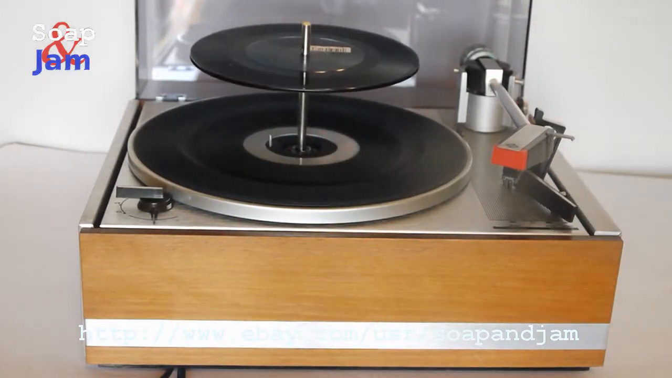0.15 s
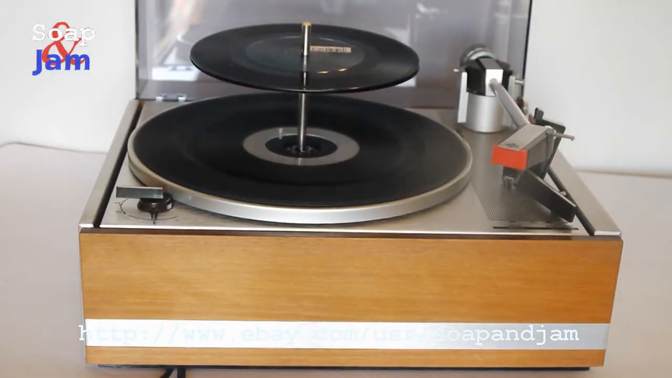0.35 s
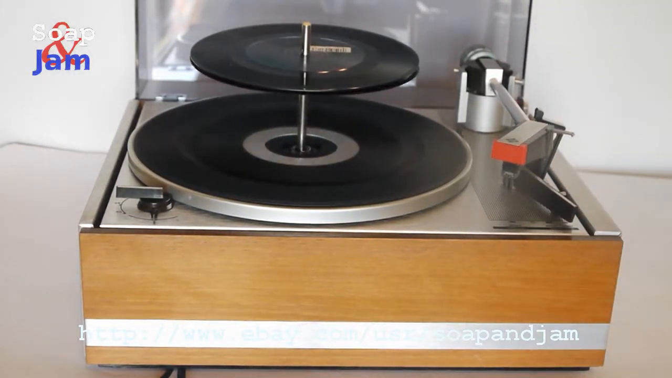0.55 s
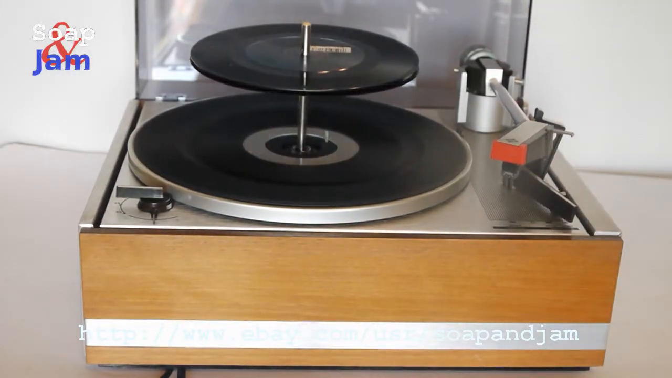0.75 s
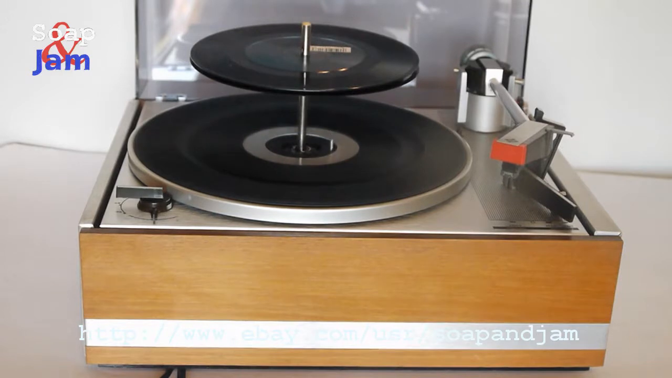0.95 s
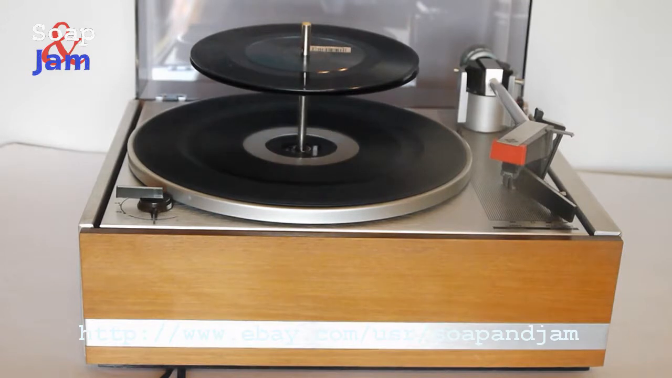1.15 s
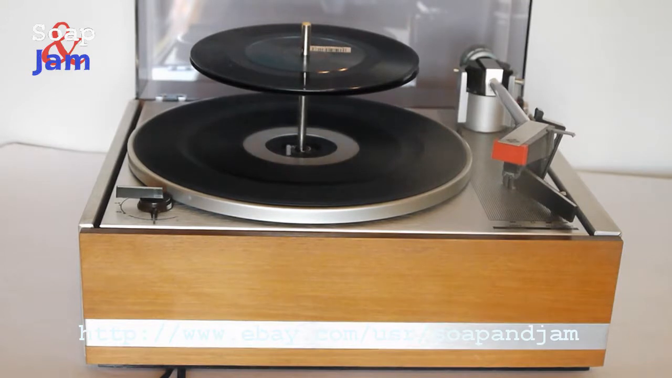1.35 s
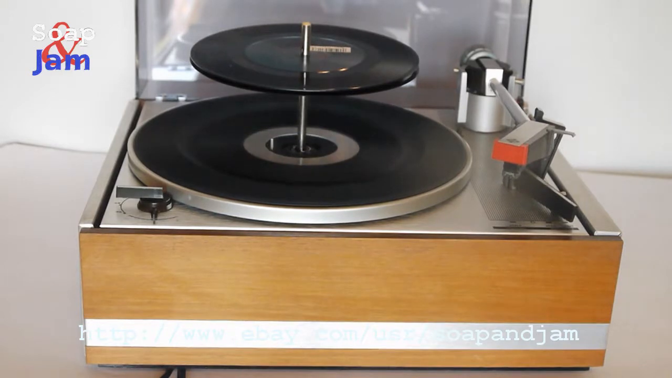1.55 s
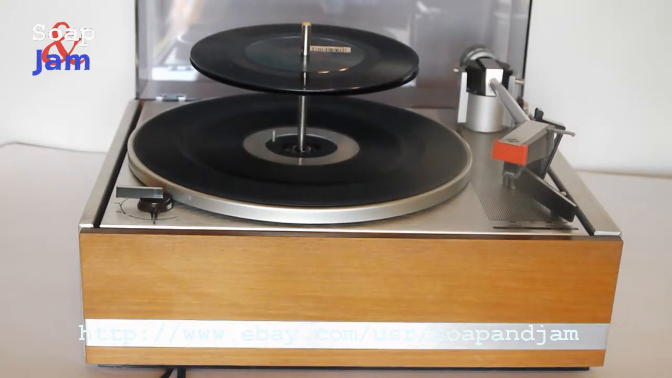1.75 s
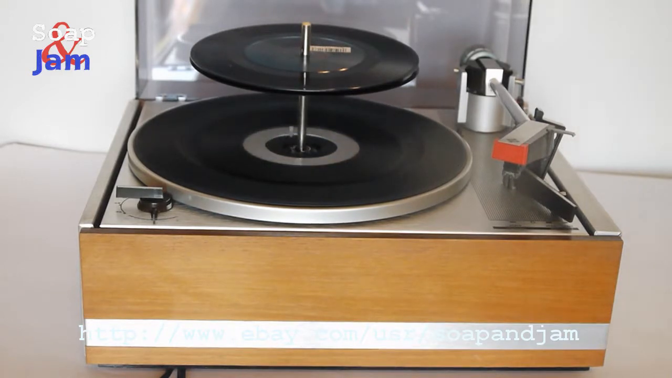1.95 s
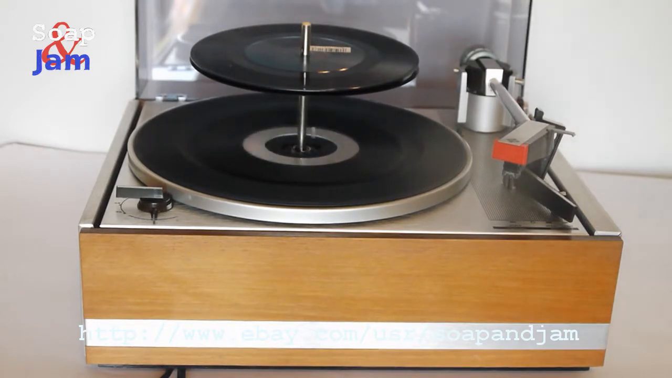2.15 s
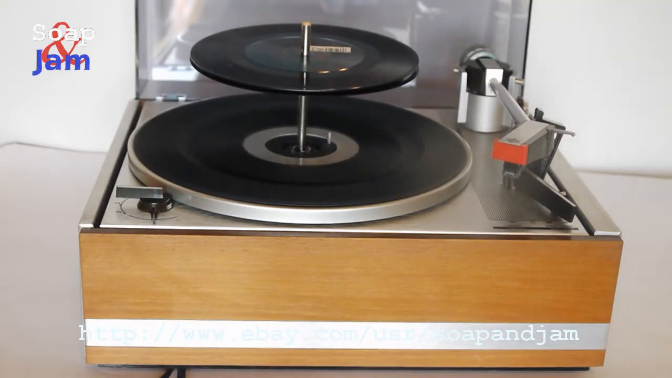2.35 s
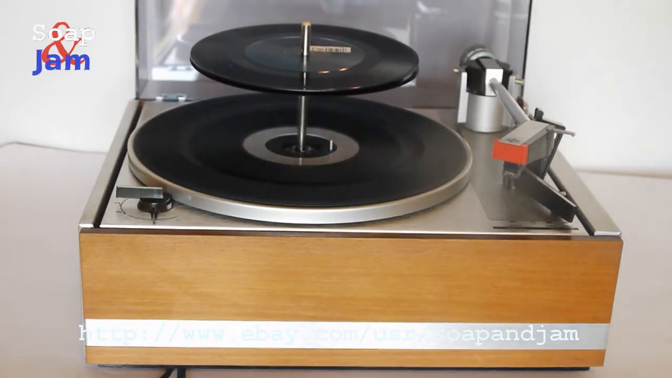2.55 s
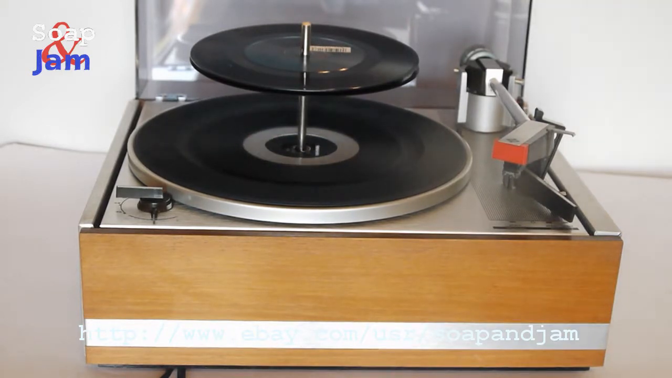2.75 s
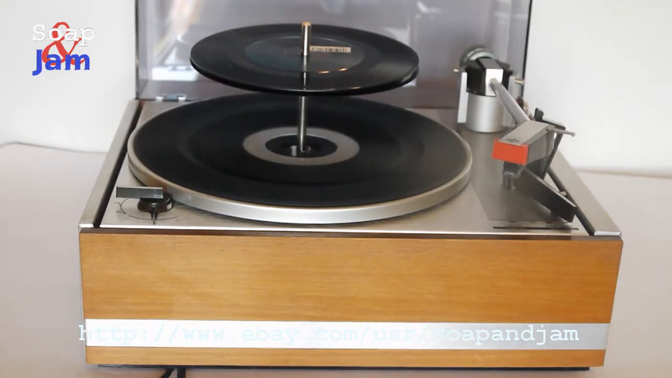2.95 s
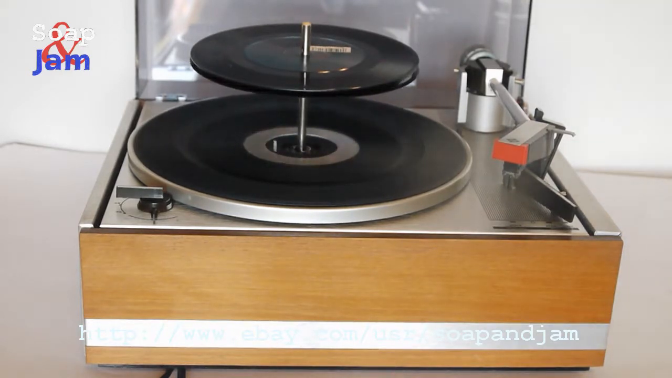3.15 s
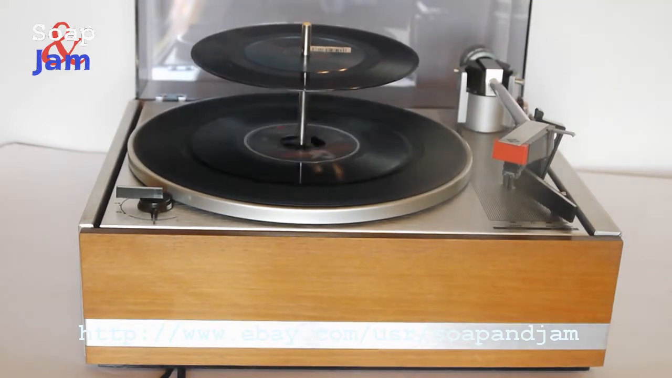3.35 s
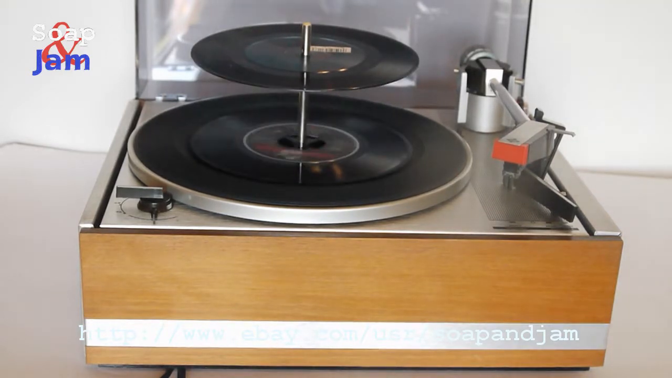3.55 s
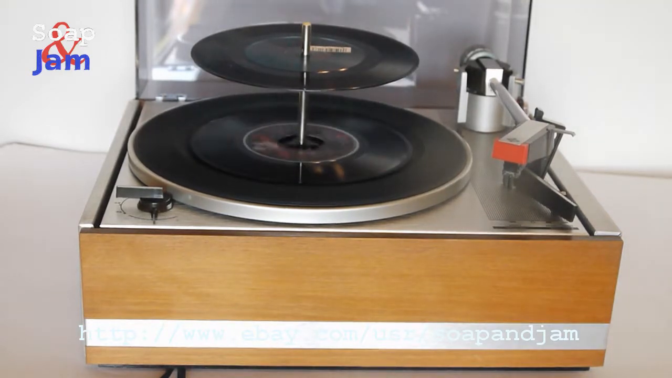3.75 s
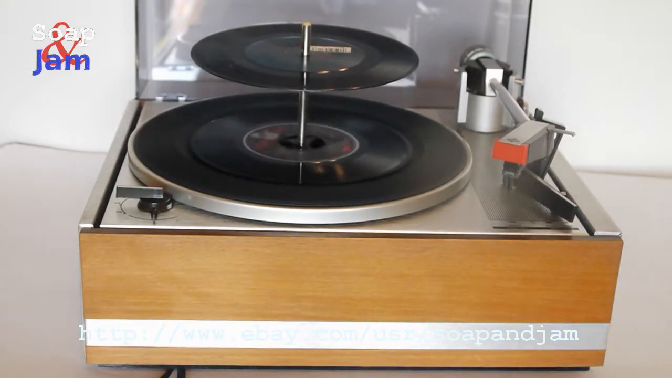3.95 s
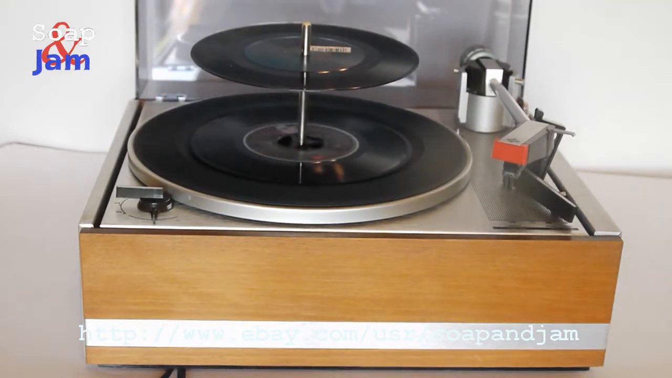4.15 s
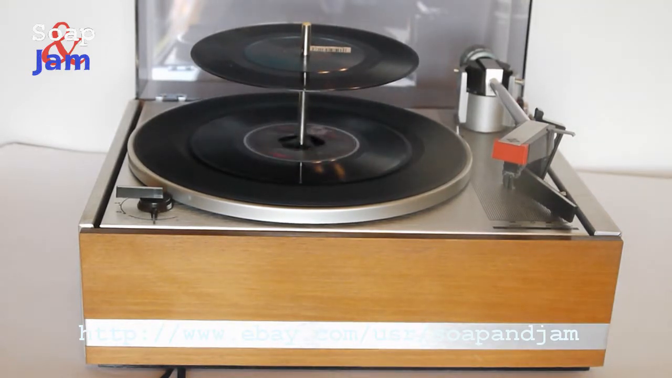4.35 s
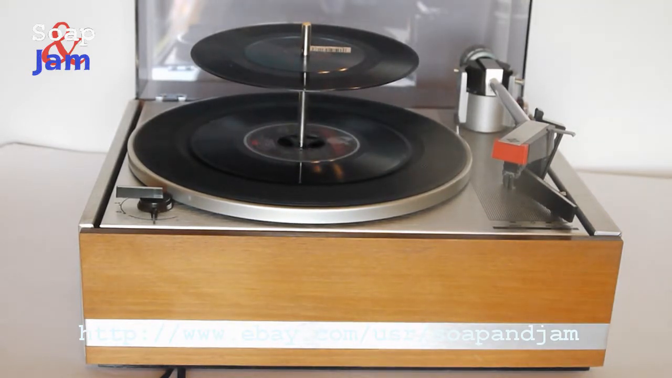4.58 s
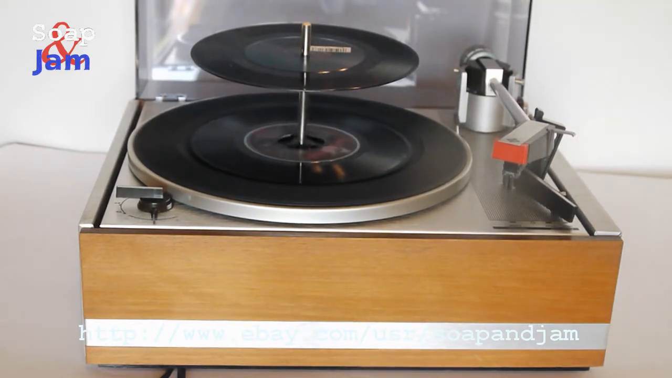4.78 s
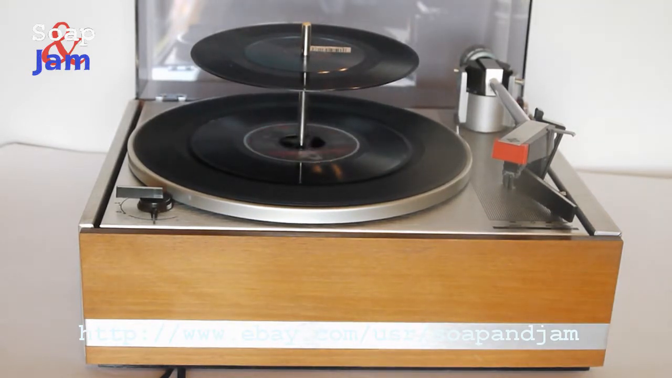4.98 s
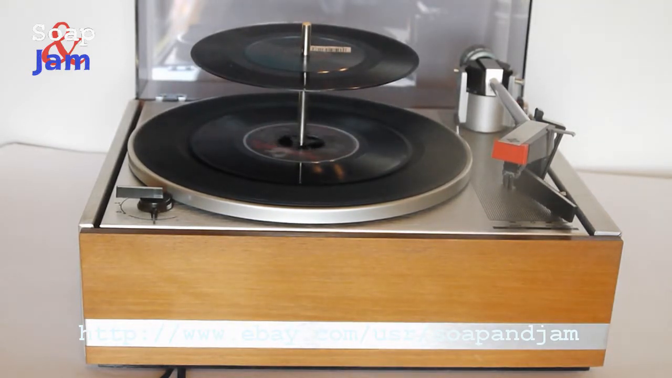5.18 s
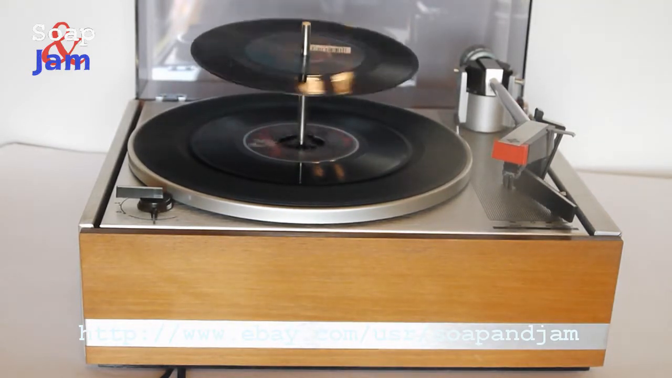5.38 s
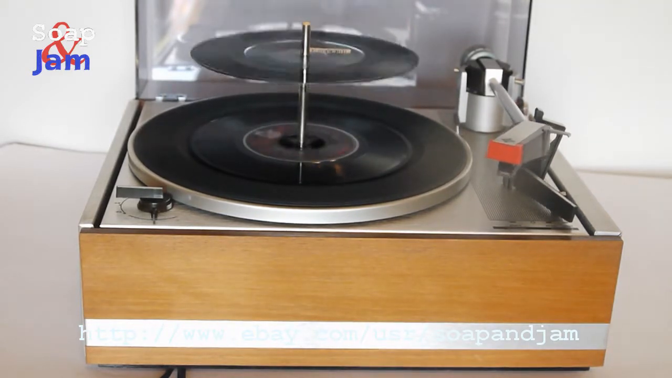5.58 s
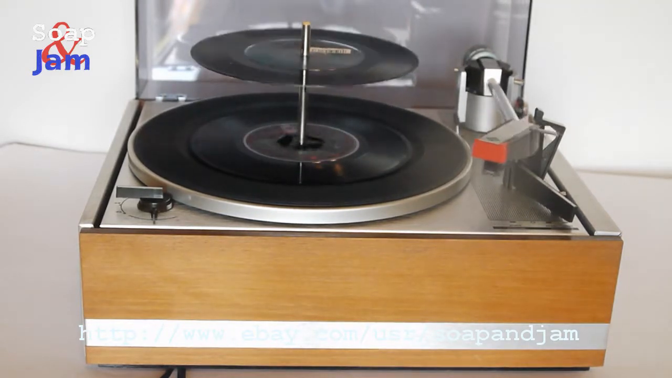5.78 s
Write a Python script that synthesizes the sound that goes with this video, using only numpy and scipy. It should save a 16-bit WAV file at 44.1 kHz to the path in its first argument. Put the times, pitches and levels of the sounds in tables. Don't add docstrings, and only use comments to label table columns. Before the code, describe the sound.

Close mono pickup of a record changer in a small room. A low motor hum and whir runs throughout under faint rubbing and thin squeaks. Sparse light clicks and regular soft ticks lead to a sharp release snap, then a loud flat slap as the disc hits the platter with a woody boom. Afterward come a softer settling tap, lever clanks, a pawl and a brief arm rattle.

```python
import sys
import numpy as np
from scipy import signal
from scipy.fft import rfft, irfft, next_fast_len
from scipy.io import wavfile
from scipy.ndimage import uniform_filter1d, map_coordinates

SR = 44100
rng = np.random.default_rng(int(sys.argv[2]) if len(sys.argv) > 2 else 0)


def makeup_ratio(level_db):
    decades = np.asarray(level_db, float) / 20
    return 10 ** decades


def log_audio(samples):
    frames = np.atleast_2d(samples).T
    limited = np.clip(frames, -1, 1)
    pcm = np.round(limited * 32767).astype(np.int16)
    wavfile.write(sys.argv[1], SR, pcm)


N = 256652


# t/s, level/dB
RELEASE = [
    (3.2145, -16.5),
    (3.224, -14),
    (3.231, -16.5),
    (3.238, -24.5),
    (3.262, -28),
]
# t/s, level/dB
LANDING = [
    (3.338, -6),
    (3.3428, -3),
    (3.3456, -2),
    (3.3495, -7.5),
    (3.356, -13),
]
# t/s, level/dB
SETTLING = [
    (3.675, -22),
    (3.682, -26),
    (3.7, -25.5),
    (3.722, -28.5),
    (3.735, -40),
]
# tilt/(dB/octave), rattle t60/s, ring/dB
RELEASE_FEEL = [(3, .045, -5), (-4, 0.059, -0.5)]
LANDING_FEEL = [(7.5, 0.014, -6.5), (-1.05, 0.081, -10)]
SETTLING_FEEL = [(-.3, 0.057, -8.5), (-.6, 0.071, -15)]
# f/Hz, width/Hz, level/dB
SPINDLE = [(620, 30, -10), (729, 42, -4), (960, 58, -3.5), (1535, 51, -3), (2064, 80, -5.5),
           (2510, 510, -14), (5540, 220, -25), (6250, 190, -24.5)]
PLATTER = [(970, 35, -17), (1460, 190, 2.5), (1766, 38, 1.5), (2960, 90, 1.5), (3450, 94, -0.5),
           (4440, 520, -2.5), (4940, 91, -9), (5130, 240, 0.5)]
# f/Hz, level/(dB per Hz)
SPINDLE_COLOUR = [(180, -22), (300, 7), (530, -1.5), (1500, -1.5), (2130, -9.5), (4100, -18), (6200, -11),
                  (7500, -22)]
PLATTER_COLOUR = [(180, -46), (300, -6), (900, -4), (1500, 2), (2000, -1.5), (5200, -2), (6400, -8),
                  (7500, -21)]
LEVER_COLOUR = [(150, -54), (400, -18.5), (1000, -10), (3000, -18), (7000, -25)]


def disc():
    release = strike(run_of(RELEASE, RELEASE_FEEL), SPINDLE, SPINDLE_COLOUR, wet_db=-4.5)
    landing = strike(run_of(LANDING, LANDING_FEEL), PLATTER, PLATTER_COLOUR, wet_db=-5.5)
    settling = strike(run_of(SETTLING, SETTLING_FEEL), PLATTER, LEVER_COLOUR, wet_db=-3.0)
    return release + landing + settling


# t/s, level/dB
LATCH = [
    (.2505, -25.5),
    (.2535, -20.5),
    (.2585, -24.5),
]
# t/s, level/dB
TICKS = [(.487, -34), (.9763, -32.5), (1.502, -34.5), (2.0086, -32), (2.5387, -32), (3.0525, -34),
         (3.5746, -35), (4.0904, -35), (4.613, -35), (5.1198, -34.5), (5.6488, -33)]
# t/s, level/dB, tilt/(dB/octave), rattle
# t60/s
CLICKS = [(1.217, -35.5, -3, 0.066), (1.259, -34.5, -2, .048), (1.287, -32.5, 1, 0.027),
          (1.502, -41, -2, .04), (1.738, -31, -2.5, 0.09), (1.778, -23.5, 3, 0.057),
          (2.735, -34.5, -9, 0.055), (2.848, -37.5, -2.5, 0.037), (3.110, -17.5, 2.5, 0.061),
          (4.034, -26, 0.5, 0.066), (4.081, -29, -3.5, 0.048), (4.138, -29, -11, 0.086),
          (5.25, -40, -1, .06)]
# t/s, level/dB
PAWL = [
    (4.830, -31.5),
    (4.845, -40),
    (4.867, -29.5),
    (4.885, -36),
]
# t/s, level/dB
CLANKS = [
    (4.306, -21.5),
    (4.322, -27.5),
]
BIG_CLANK = [
    (4.6525, -15.5),
    (4.659, -17),
]
# t/s, level/dB
ARM_SWING = [
    (5.417, -26.5),
    (5.426, -43),
    (5.445, -30),
    (5.463, -27),
    (5.473, -32.5),
    (5.489, -29.5),
    (5.499, -32),
    (5.512, -36),
    (5.535, -42),
]
# tilt/(dB/octave), rattle t60/s, ring/dB
LATCH_FEEL = [(.3, 0.075, -1.7), (-0.32, 0.042, -1.7)]
TICK_FEEL = [(-6.5, 0.033, 7), (-3, 0.03, 7)]
PAWL_FEEL = [(.7, 0.13, -2.2), (-.3, 0.075, -1.5)]
CLANK_FEEL = [(-2, 0.053, .6), (-.6, 0.022, 5)]
BIG_CLANK_FEEL = [(3, 0.012, 3), (-.3, 0.073, 7.7)]
ARM_FEEL = [(1, 0.033, 2), (-5.5, 0.071, 6)]
# f/Hz, width/Hz, level/dB
CATCH = [(1310, 63, -18), (2045, 380, -2.5), (2666, 15, 5.5), (3300, 380, -13)]
GEAR = [(1737, 81, 2.5), (1943, 200, -1.5), (3800, 330, -14.5)]
CHASSIS = [(1150, 200, -3), (2180, 320, 0), (2670, 250, -2.5), (3440, 200, -10), (4680, 240, -12.5)]
SPRING = [(1365, 38, 5), (2050, 210, -3), (2790, 48, 1), (3270, 150, -5), (5300, 460, -12)]
SMALL_LEVER = [(1230, 58, -2), (1890, 52, -12.5), (2190, 120, -11), (2450, 80, -18), (3100, 37, -11.5),
               (5600, 110, -22)]
LEVER = [(1016, 100, -4.5), (1255, 52, 4.5), (2200, 160, -5), (3264, 145, -4.5), (4650, 140, -11.5),
         (5950, 230, -15)]
ARM = [(996, 60, -1), (1106, 39, 5), (1190, 60, 0.5), (1314, 82, -3), (1894, 51, -5.5), (2350, 300, -16),
       (3420, 120, -8.5), (4380, 140, -17)]
# f/Hz, level/(dB per Hz)
CATCH_COLOUR = [(150, -36), (250, -8), (1300, -3), (2000, -8), (2650, -3.5), (3950, -19), (6090, -10),
                (7000, -27.5)]
GEAR_COLOUR = [(800, -37.5), (1500, -16), (2200, -16.5), (4000, -17.5), (7000, -43.5)]
CHASSIS_COLOUR = [(200, -31.5), (300, -15.5), (880, -9.5), (2000, -6), (2620, -6), (3980, -12),
                  (4700, -11.5), (7000, -20)]


def mechanism():
    click_ring_db = -3
    click_contacts = [(*row, click_ring_db) for row in CLICKS]
    catch = strike(run_of(LATCH, LATCH_FEEL), CATCH, CATCH_COLOUR, wet_db=-3.5)
    ticks = strike(run_of(TICKS, TICK_FEEL), GEAR, GEAR_COLOUR, wet_db=-2)
    clicks = strike(click_contacts, CHASSIS, CHASSIS_COLOUR, wet_db=-5.0)
    pawl = strike(run_of(PAWL, PAWL_FEEL), SPRING, LEVER_COLOUR, wet_db=-3.0)
    clanks = strike(run_of(CLANKS, CLANK_FEEL), SMALL_LEVER, LEVER_COLOUR, wet_db=-4.5)
    big_clank = strike(run_of(BIG_CLANK, BIG_CLANK_FEEL), LEVER, LEVER_COLOUR, wet_db=-3.0)
    arm = strike(run_of(ARM_SWING, ARM_FEEL), ARM, LEVER_COLOUR, wet_db=-3.5)
    return catch + ticks + clicks + pawl + clanks + big_clank + arm


# t/s, level/dB
THUDS = [
    (1.744, -38.5),
    (1.785, -43),
    (3.119, -33.5),
    (3.227, -30),
    (3.235, -27),
    (3.346, -17),
    (3.42, -30.5),
    (4.139, -39),
    (4.655, -34),
]
# f/Hz, level/dB, t60/s
PLINTH = [(291.2, 3, 0.17), (310, 0, 0.1), (270, -23.5, 0.085)]


def plinth():
    out = np.zeros(N + SR)
    t = np.arange(SR // 3) / SR
    onset = 1 - np.exp(-t / 0.0043)
    for s, db in THUDS:
        boom = 0
        for hz, level_db, t60_s in PLINTH:
            decay = makeup_ratio(level_db + rng.normal(0, 0.61) - 60 * t / t60_s)
            boom = boom + decay * np.sin(2 * np.pi * hz * t)
        out[round(s * SR):][:len(t)] += makeup_ratio(db - 3.0) * onset * boom
    return out[:N]


# t/s, half length/s, rub level/dB, grit level/dB
LOBES = [
    (0, 0.075, -61, -60),
    (0.56, 0.15, -74, -59),
    (.92, .12, -75, -60.5),
    (2.815, 0.13, -65.5, -75),
    (2.944, 0.047, -51, -75),
    (3.306, .07, -54, -75),
    (3.563, 0.089, -65.5, -67),
    (4.813, .1, -66, -78),
    (5.536, 0.14, -69, -75),
]
# f/Hz, level/(dB per Hz)
RUB = [(700, -28.5), (1300, -6), (1900, -2), (2600, -3), (3800, -8), (5000, -10.5), (5900, -11),
       (7000, -20.5)]
GRIT = [(2500, -29), (3400, -2.5), (4300, 2), (5000, -1.5), (5800, -2), (6500, -20.5)]


def cam():
    rub_floor_db, grit_floor_db = -58.5, -77
    s, half_s, rub_db, grit_db = np.transpose(LOBES)[..., None]
    pressing = np.exp(-((np.arange(N) / SR - s) / half_s) ** 2)
    rub = makeup_ratio(rub_floor_db) + (makeup_ratio(rub_db) * pressing).sum(axis=0)
    rub = rub * makeup_ratio(1.5 + 0.65 * wobble(22))
    grit = makeup_ratio(grit_floor_db) + (makeup_ratio(grit_db) * pressing).sum(axis=0)
    return grit * rush(GRIT, patchy_db=2.5) + rub * rush(RUB, patchy_db=1.5) + squeaks()


# t/s, length/s, first f/Hz, last f/Hz, level/dB
SQUEAKS = [(0.456, 0.17, 5800, 5620, -65), (.66, 0.1, 5700, 5670, -62), (.72, 0.14, 4650, 5500, -61),
           (0.828, .25, 5420, 5360, -61.5), (1.042, .18, 5420, 5950, -71), (1.691, 0.17, 4900, 5600, -61),
           (1.922, 0.11, 5750, 5600, -65), (2.136, 0.19, 5700, 5780, -65), (3.287, 0.051, 6200, 6150, -53),
           (3.592, .07, 5800, 5700, -68), (3.762, .26, 6330, 6000, -66.5), (4.201, .08, 6250, 6290, -66),
           (4.4, 0.21, 5840, 5800, -68), (4.878, 0.26, 5700, 5820, -59.5), (4.9, 0.38, 5630, 5540, -66),
           (5.159, 0.1, 5780, 5680, -63.5)]


def squeaks():
    fade_share, tone_over_noise = 0.2, 0.8
    width_hz, wander_hz = 130, 25
    out = np.zeros(N)
    for s, length_s, first_hz, last_hz, db in SQUEAKS:
        u = np.linspace(0, 1, round(length_s * SR))
        n = len(u)
        gate = np.clip(np.minimum(u, 1 - u) / fade_share, 0, 1)
        breath = tone_over_noise + wobble(width_hz, count=n) + 1j * wobble(width_hz, count=n)
        breath *= makeup_ratio(1.7 * wobble(30, count=n))
        pitch_hz = first_hz + (last_hz - first_hz) * u + wander_hz * wobble(15, count=n)
        whistle = np.real(breath * np.exp(2j * np.pi * np.cumsum(pitch_hz) / SR))
        out[round(s * SR):][:n] += gate * makeup_ratio(db - 2.5) * whistle
    return out


# multiple of mains, rms level/dB
HUM = [(2, -56.5), (4, -68), (5, -51), (7, -56), (9, -59.5), (11, -65), (13, -60), (19, -62), (23, -72.5)]
# f/Hz, level/(dB per Hz)
WHIR = [(20, -36), (40, -8.5), (62, -20), (85, -21.5), (130, -12.5), (200, -13.5), (245, -7), (300, -11),
        (500, -13.5), (900, -12.5), (1200, -16), (2000, -24.5), (3500, -42)]
# t/s, whir level/dB
LOAD = [(0, -45.5), (1.05, -45.5), (1.7, -44.5), (2.55, -45.5), (3.2, -43), (3.45, -46.5), (3.8, -47.5),
        (4.6, -46), (5.4, -44.5), (5.82, -45.5)]


def motor():
    mains_hz = 50.0
    phase = 2 * np.pi * mains_hz * np.arange(N) / SR
    whir_db = curves(LOAD)[0]
    hum = 0
    for k, db in HUM:
        hum = hum + np.sqrt(2) * makeup_ratio(db + 0.35 * wobble(7)) * np.cos(k * phase)
    throb = 1 + 0.029 * np.cos(2 * phase)
    whir = unit(throb * makeup_ratio(0.17 * wobble(13)) * rush(WHIR, patchy_db=0.62))
    hum_swing_db = 0.83 * (whir_db - whir_db.mean())
    return makeup_ratio(hum_swing_db) * hum + makeup_ratio(whir_db - 1.24) * whir


# f/Hz, t60/s
ROOM = [(250, 0.76), (1000, 0.33), (3000, 0.31), (7000, 0.25)]


def room_tails(count):
    hz, t, z = signal.stft(rng.standard_normal((count, SR // 3)), SR, nperseg=256)
    decay = makeup_ratio(-60 * t / along(ROOM, hz)[:, None])
    tails = signal.istft(z * decay, SR, nperseg=256)[1]
    tails = tails / np.linalg.norm(tails, axis=1, keepdims=True)
    return np.pad(tails, ((0, 0), (round(.005 * SR), 0)))


def strike(contacts, peaks, colour, wet_db):
    s, db, tilt_db, t60_s, ring_db = np.transpose(contacts)[..., None]
    out = np.zeros(N + SR)
    t = np.arange(SR // 6) / SR
    decay = makeup_ratio(-60 * t / np.maximum(t60_s, .004))
    rattle = rng.standard_normal((len(s), 2, len(t))) * decay[:, None]
    rattle[..., 0] += 4.5

    def slope(f):
        return makeup_ratio(tilt_db * np.log2(np.clip(f, 300, 8000) / 2000))

    def ring(f):
        total = 0
        for k, (centre, width, level_db) in enumerate(peaks):
            damping = 1j * f * width
            total = total + (-1) ** k * makeup_ratio(level_db) * damping / (centre * centre - f * f + damping)
        return total

    def peak_one(x):
        return x / np.abs(x).max(axis=1, keepdims=True)

    crack = filtered(rattle[:, 0], lambda f: makeup_ratio(along(colour, f)) * slope(f))
    body = filtered(rattle[:, 1], lambda f: ring(f) * slope(f))
    hits = makeup_ratio(db) * peak_one(peak_one(crack) + makeup_ratio(ring_db) * peak_one(body))
    heard = makeup_ratio(wet_db) * signal.fftconvolve(hits, room_tails(count=len(s)), axes=1)
    heard[:, :len(t)] += hits
    for start_s, sound in zip(s[:, 0], heard):
        out[round(start_s * SR):][:len(sound)] += sound
    return out[:N]


def run_of(contacts, feel):
    first, last = np.array(feel)
    return np.hstack([contacts, np.linspace(first, last, len(contacts))])


def rush(spectrum, patchy_db):
    z = signal.stft(rng.standard_normal(N + 512), nperseg=512)[2]
    field = uniform_filter1d(rng.standard_normal(z.shape), size=6, axis=0)
    field = uniform_filter1d(field, size=10, axis=1)
    patched = signal.istft(z * makeup_ratio(patchy_db * unit(field)), nperseg=512)[1][:N]
    return unit(filtered(patched, lambda hz: makeup_ratio(along(spectrum, hz))))


def wobble(rate_hz, count=N):
    end = count * rate_hz / SR
    coarse = np.linspace(0, end, int(end) * 8 + 9)
    knots = rng.standard_normal(int(end) + 4)
    return np.interp(np.linspace(0, end, count), coarse, map_coordinates(knots, [coarse]))


def filtered(x, response):
    m = next_fast_len(x.shape[-1] + 8192)
    return irfft(rfft(x, m) * response(np.fft.rfftfreq(m, 1 / SR)), m)[..., :x.shape[-1]]


def curves(rows):
    s, *cols = np.transpose(rows)
    return [np.interp(np.arange(N) / SR, s, c) for c in cols]


def along(points, hz):
    f, v = np.transpose(points)
    return np.interp(np.log(hz + 1), np.log(f + 1), v)


def unit(x):
    return x / np.sqrt(np.mean(x ** 2) + 1e-20)


def scene():
    return (motor() + cam() + mechanism() + disc() + plinth())[None]


def top_cut(x):
    return signal.sosfilt(signal.butter(12, 7860, fs=SR, output="sos"), x)


# f/Hz, level/dB
MICROPHONE = [(6000, -0.5), (6600, -2.5), (7100, -16), (7600, -37), (8300, -56.5)]


def record(dry):
    mix = filtered(dry, lambda hz: makeup_ratio(along(MICROPHONE, hz)))
    return top_cut(mix)


dry = scene()
out = record(dry)
log_audio(out)
```